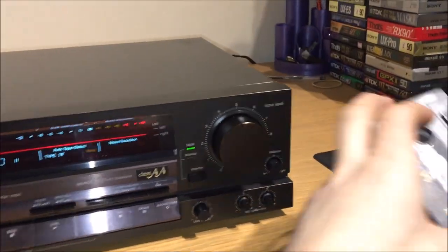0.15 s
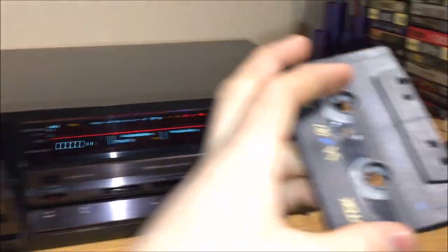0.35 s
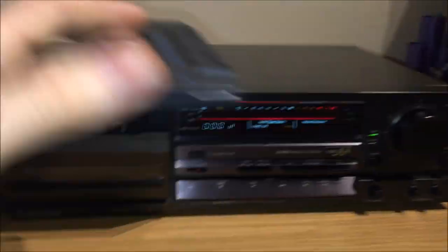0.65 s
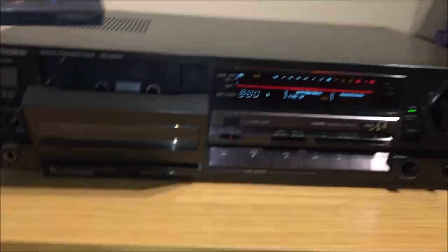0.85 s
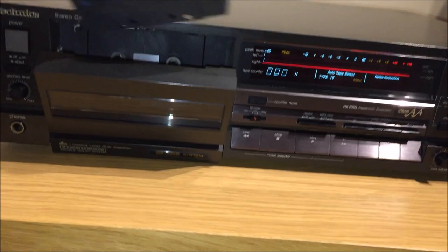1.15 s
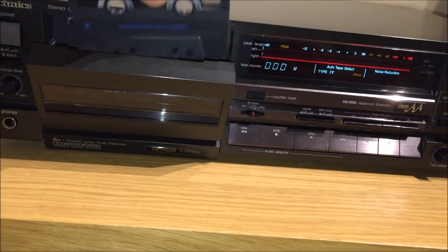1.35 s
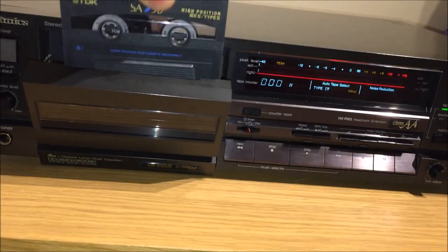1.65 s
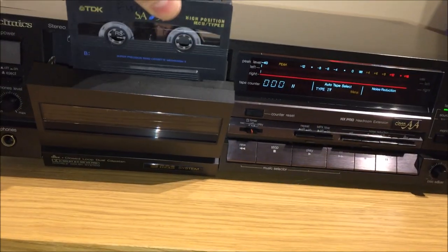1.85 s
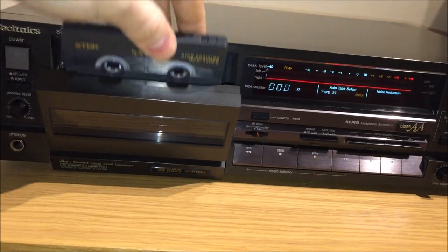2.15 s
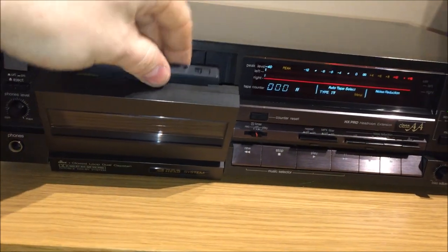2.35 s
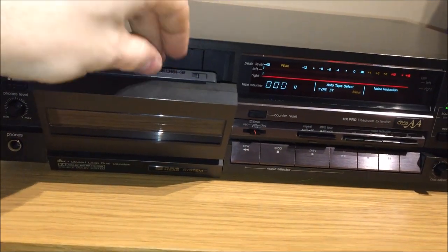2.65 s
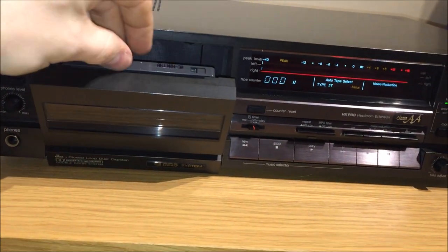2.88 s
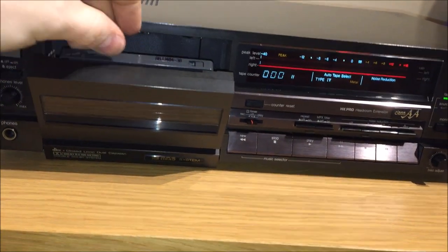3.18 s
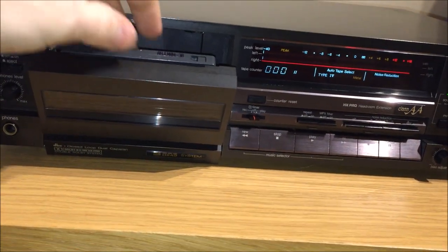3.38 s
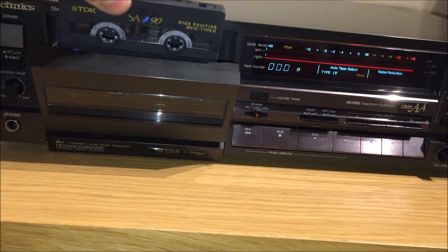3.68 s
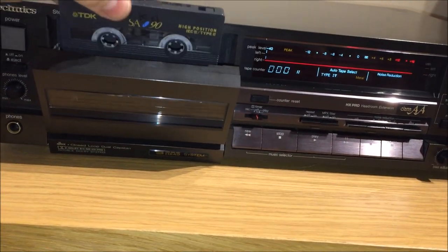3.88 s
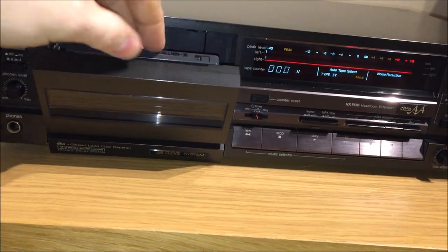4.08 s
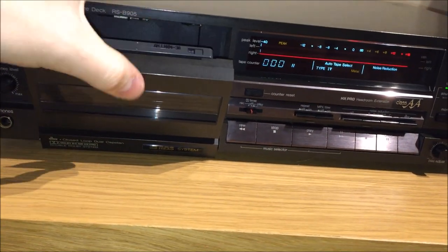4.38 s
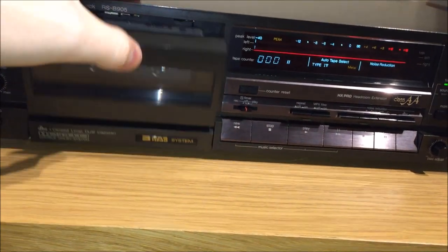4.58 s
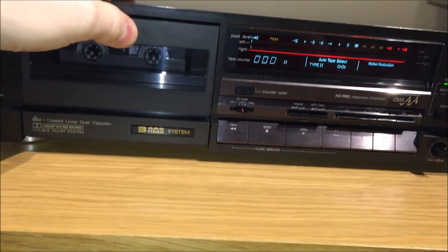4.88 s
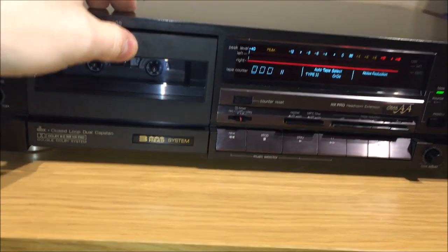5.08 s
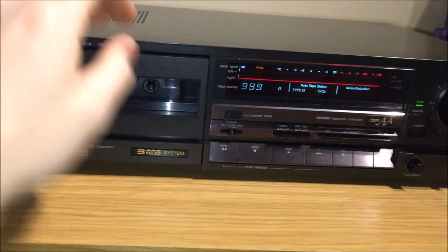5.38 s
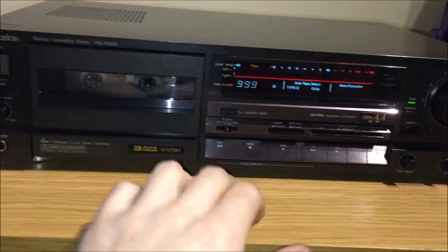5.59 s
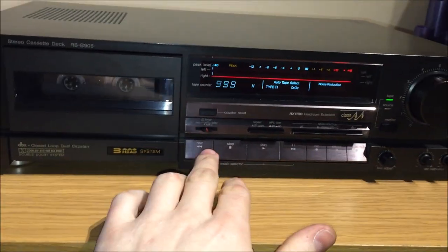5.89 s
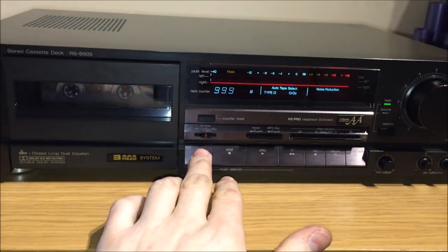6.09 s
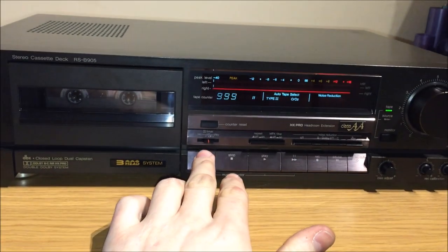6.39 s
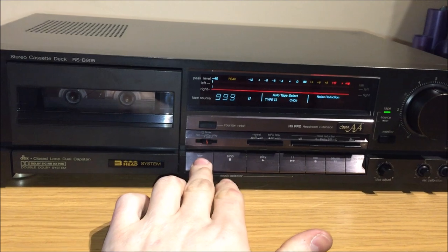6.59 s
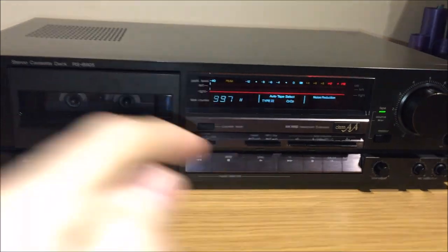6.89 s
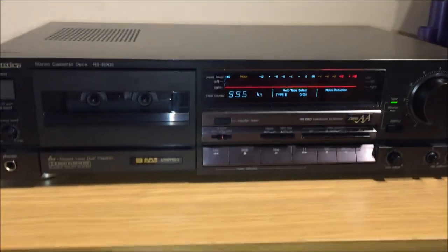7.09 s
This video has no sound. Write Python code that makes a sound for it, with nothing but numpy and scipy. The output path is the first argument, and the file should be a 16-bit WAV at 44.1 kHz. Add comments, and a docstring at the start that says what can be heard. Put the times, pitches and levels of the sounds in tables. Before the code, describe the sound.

A small, quiet room with a faint low hush, heard close up by a small microphone with thin bass. At 0 s a cassette lifts off the desk with light ticks and a brief rub; a dry plastic clack follows near 0.45. From 0.9 to 1.25 its loose hubs rattle brightly. At 1.5 it hits the deck's holder with a sharp crack and tiny spring ping, then knocks hollowly and scrapes until a firmer clack at 2.6. Sparse small taps follow around 3.1. Scraping and knocking resume at 3.55-3.75, and a loud scuff and crack seat it at 4.13-4.25. The door drags softly and snaps shut at 4.8-4.87. Metal levers clunk at 5.4, with dull soft bumps near 5.7. After a near-silent pause, a key clicks at 6.6 with a lever clack, and from 6.72 a faint, fluttering motor whir rises slightly in pitch and continues to the end.

```python
"""A cassette is picked up, rattling in its shell, and slid into the open door of a tape deck on a wooden desk.
It knocks and scrapes in the holder, drops home, and the door is pushed shut.
The transport clunks, a key is pressed and the reel motor whirs up, in a small quiet room.
Blows set off ringing modes and noise bursts, friction is a stream of tiny slips, and the motor adds whining sines."""
import sys
import numpy as np
from scipy import signal
from scipy.fft import rfft, irfft
from scipy.io import wavfile
from scipy.ndimage import uniform_filter1d

SR = 44100
rng = np.random.default_rng(int(sys.argv[2]) if len(sys.argv) > 2 else 0)


def wav_out(sig):
    """Save sig, one row per channel (or a flat mono array), as 16-bit PCM at SR to the path in sys.argv[1]."""
    wavfile.write(sys.argv[1], SR, np.round(np.clip(np.atleast_2d(sig).T, -1, 1) * 32767).astype(np.int16))


N = 319284
TIME = np.arange(N) / SR

# Levels in all tables are relative: each layer adds its own trim. Long decays may be shortened in ring().
# Ringing modes of the cassette holder: pitch_hz [Hz], level_db [dB], t60_s [s]
HOLDER_MODES = [(900, -17.5, 0.048), (1218, -16, 0.21), (1181, -2.5, 0.047), (1160, -13, 0.077),
                (1410, -19.5, 0.071), (1748, -18, 0.084), (1850, -22.5, 0.011)]
# Colour of hard plastic cracking: freq_hz [Hz], density_db [dB per Hz]
CRACK_COLOUR = [(250, -19), (550, -6.5), (850, -1), (1400, 6), (1900, 2.5), (2750, 0.5), (3400, -5),
                (4200, -1), (4850, -11.5), (5400, -6), (7000, -13.5), (11000, -29)]
# Colour of the bright tick from a sharp edge: freq_hz [Hz], density_db [dB per Hz]
EDGE_COLOUR = [(2000, -24), (5000, -3), (6800, -0.5), (9000, 0.5), (11000, -1.5), (14000, -2), (16000, -10)]
# Colour of the dull thud of the case: freq_hz [Hz], density_db [dB per Hz]
THUD_COLOUR = [(20, -42.5), (45, -16.5), (72, -7), (120, 3), (160, -10), (250, 8), (360, 0), (470, -9.5),
               (750, 0.5), (1500, -25), (5000, -53)]
# Plastic sliding in the holder: start_s [s], length_s [s], level_db [dB]
SLIDES = [(1.44, 0.073, -56), (1.86, 0.062, -41), (2.19, 0.18, -46.5), (2.345, 0.15, -38),
          (2.52, 0.085, -46.5), (3.555, 0.14, -35), (3.689, 0.07, -45.5), (4.035, 0.11, -42.5),
          (4.129, 0.07, -28.5), (4.62, .18, -52.5), (5.131, 0.04, -51)]


def from_db(db):
    """Decibels to gain."""
    return 10 ** (np.asarray(db) / 20)


def rms_one(x):
    """Scale to unit power."""
    return x / np.sqrt(np.mean(x ** 2) + 1e-20)


def at_hz(points, hz):
    """Read a table on a log-frequency axis."""
    freqs, values = np.transpose(points)
    return np.interp(np.log(np.maximum(hz, 1)), np.log(freqs), values)


def filtered(x, order, edge_hz, kind):
    """Causal Butterworth filter."""
    return signal.sosfilt(signal.butter(order, edge_hz, kind, fs=SR, output="sos"), x)


def coloured(x, spectrum):
    """Causal (minimum-phase) filter with this spectrum; white noise keeps its power."""
    size = 8192
    half = size // 2
    gain = rms_one(from_db(at_hz(spectrum, np.linspace(0, SR / 2, half + 1))))
    cepstrum = irfft(np.log(gain))
    # folding the cepstrum onto positive time gives the minimum phase
    fold = np.r_[1, np.full(half - 1, 2), 1, np.zeros(half - 1)]
    impulse_response = irfft(np.exp(rfft(cepstrum * fold)))
    return signal.oaconvolve(x, impulse_response)[:N]


def drift(per_s):
    """Smooth chance with spread 1."""
    knots = rng.standard_normal(4000)
    return rms_one(np.interp(TIME * per_s, np.arange(len(knots)), knots))


def strokes(rows):
    """Gain of separate strokes: each swells and fades, with its onset and end smoothed over about 9 ms."""
    share = np.array([0, 0.4, 1])  # start, peak and end as shares of the length
    fade_db = np.array([10.5, 0, 10.5])  # the ends are this much weaker
    gain = 0
    for start, length, db in rows:
        gain = gain + from_db(np.interp(TIME, start + length * share, db - fade_db, left=-200, right=-200))
    return uniform_filter1d(gain, size=400)


def blows(times, db):
    """One impulse for each contact."""
    out = np.zeros(N)
    places = np.round(np.asarray(times) * SR).astype(int)
    out[np.clip(places, 0, N - 1)] = from_db(db)
    return out


def ring(clicks, hz, t60):
    """A unit click sets a sine of height about 1 ringing; damping limits how long a mode can last."""
    longest_s = max(60 / hz, .12)
    radius = from_db(-60 / (min(t60, longest_s) * SR))
    angle = 2 * np.pi * hz / SR
    return signal.lfilter([0, np.sin(angle)], [1, -2 * radius * np.cos(angle), radius * radius], clicks + 1e-18)


def struck(times, db, modes):
    """Every blow shares itself differently among the modes; a band filter confines the sum to their range."""
    luck_db = rng.uniform(-2, 2, (len(times), len(modes)))
    rings = 0
    for k, (hz, level, t60) in enumerate(modes):
        rings = rings + ring(blows(times, db + level + luck_db[:, k]), hz, t60)
    pitches = np.array(modes)[:, 0]
    return filtered(rings, 2, [.8 * pitches.min(), 1.15 * pitches.max()], "band")


def clatter(times, db, spectrum, t60, rise_s):
    """Crowded modes: each blow starts a burst that builds up and dies, and favours resonances of its own."""
    size = 16384
    t, out = TIME[:size], np.zeros(N + size)
    shape = (1 - np.exp(-t / rise_s)) * from_db(-60 * t / t60)
    place = np.sqrt(np.linspace(0, 1, size // 2 + 1))  # favoured bands are wider in the treble
    for s, level in zip(times, db):
        favour_db = 3.8 * np.clip(rng.standard_normal(170), -2, 1.2)
        peaks = from_db(np.interp(place, np.linspace(0, 1, len(favour_db)), favour_db))
        burst = rms_one(irfft(rfft(rng.standard_normal(size)) * peaks))
        start = max(round(s * SR), 0)
        out[start:start + size] += from_db(level) * shape * burst
    return coloured(out[:N], spectrum)


def friction(spectrum, slips_per_s, spread_db):
    """Tiny slips of uneven size, coloured by the part that they shake."""
    slips = (rng.random(N) < slips_per_s / SR) * rng.choice([-1, 1], N)
    sizes = from_db(spread_db * np.clip(rng.standard_normal(N), -2, 2))
    return coloured(rms_one(slips * sizes), spectrum)


def room(x, wet_db, first_echo_s):
    """Direct sound plus dense reflections, each band with its own decay; the echoes fade in around first_echo_s."""
    # Room decay: freq_hz [Hz], t60_s [s]
    decay_times = [(100, 0.11), (300, 0.071), (1000, 0.27), (2500, 0.3), (6000, 0.21), (14000, 0.18)]
    t = TIME[:SR * 2 // 3]
    edges = np.geomspace(40, 18000, 13)
    tail = 0
    for low, high in zip(edges, edges[1:]):
        band = filtered(rng.standard_normal(len(t)), 2, [low, high], "band")
        tail = tail + band * from_db(-60 * t / at_hz(decay_times, np.sqrt(low * high)))
    tail = tail * np.clip(t / first_echo_s - .5, 0, 1)
    tail = tail / np.sqrt(np.sum(tail ** 2))
    return x + from_db(wet_db) * signal.oaconvolve(x, tail)[:N]


def knocking():
    """The cassette knocks and slides in the hollow door, which rings with a woody, mostly direct note."""
    # Glancing knocks; a soft fingertip mostly makes the holder ring, a hard corner also cracks, a heavy push
    # shakes the case: start_s [s], strength_db [dB], hardness_db [dB], weight_db [dB]
    knocks = [(1.6633, -30, 0, 3.5), (1.7009, -28, -5, 1), (1.7744, -29, -3.5, 1), (1.8831, -28.5, 2.5, 8),
              (1.9077, -19, 0.5, 1.5), (1.9243, -30, 0, -8.5), (2.0546, -26.5, 0.5, -7),
              (2.0733, -23.5, 4, 2), (2.1863, -30.5, -1.5, -10), (2.2415, -31.5, 0, 6),
              (2.2612, -37, 12, 1), (2.365, -25.5, 0, -13), (2.4459, -30.5, -8, 7), (2.879, -51.5, 1.5, 2),
              (3.045, -27.5, 2, -2.5), (3.1668, -34.5, 13, 8.5), (3.5456, -24, 6.5, -5.5),
              (3.6083, -24.5, 4, -3), (3.633, -29, 7.5, 0), (3.6965, -24, 1.5, -3), (3.731, -26.5, 6, -1),
              (3.7487, -36, 7, 14), (4.0718, -32.5, 4, 3.5), (4.133, -9.5, -2, -13), (4.51, -47, -20, -4),
              (4.5415, -31.5, -28, -17.5), (4.5736, -44, -1.5, 16.5), (4.6631, -31.5, -0.5, 3.5),
              (4.7453, -36, 10, 10), (4.7911, -13, 1.5, 3.5), (4.8246, -15, 1.5, -5),
              (5.1585, -35.5, -24, -5)]
    # The door drags on its damper as it swings shut: start_s [s], length_s [s], level_db [dB]
    door_swing = [(4.575, 0.3, -49)]
    # Colour of the dragging door: freq_hz [Hz], density_db [dB per Hz]
    door_colour = [(60, -7.5), (130, -8), (320, 3), (500, -13), (800, 2), (1500, -18), (2800, -12.5),
                   (5000, -26), (14000, -33)]
    s, db, hard_db, weight_db = np.transpose(knocks)
    holder = struck(s + 0.00047, db, HOLDER_MODES)
    crack = clatter(s, db + hard_db - 7, CRACK_COLOUR, t60=0.039, rise_s=0.0018)
    ticks = clatter(s, db + hard_db - 24, EDGE_COLOUR, t60=0.037, rise_s=0.00054)
    case = chassis(s, db + weight_db - 16, db + weight_db - 21, lowest_hz=100)
    door = strokes(door_swing) * friction(door_colour, slips_per_s=220, spread_db=2.5)
    plastic = room(crack + ticks + sliding() + door, wet_db=-7.5, first_echo_s=0.0041)
    return plastic + room(holder, wet_db=-13, first_echo_s=0.0043) + case


def sliding():
    """Stick and slip: uneven little jerks hiss on the plastic and keep the holder's note ringing."""
    # Colour of plastic scraping: freq_hz [Hz], density_db [dB per Hz]
    slide_colour = [(150, -15.5), (330, 5.5), (500, -28.5), (900, -6), (1180, -1.5), (1500, -8),
                    (2200, -12), (4200, -21.5), (7000, -29), (15000, -39)]
    jerks = (rng.random(N) < 500 / SR) * rng.standard_normal(N)
    note = rms_one(sum(from_db(db) * ring(jerks, hz, t60) for hz, db, t60 in HOLDER_MODES))
    hiss = friction(slide_colour, slips_per_s=900, spread_db=4)
    # the slide catches and lets go in uneven scuffs
    scuffs = from_db(4 * np.clip(drift(per_s=70), -2, 1))
    return strokes(SLIDES) * scuffs * (from_db(-4.5) * note + from_db(-4) * hiss) + grit()


def grit():
    """Edges catch at chance moments of each slide and give tiny knocks, as strong as the push behind them."""
    catches_per_s, spread_db = 70, 2
    s = np.concatenate([start + length * rng.random(round(catches_per_s * length)) for start, length, _ in SLIDES])
    push = strokes(SLIDES)[(s * SR).astype(int)]
    db = 20 * np.log10(push + 1e-9) + spread_db * rng.uniform(-1, 1, len(s))
    return clatter(s, db, CRACK_COLOUR, t60=0.018, rise_s=.0004)


def slamming():
    """Cassette and door hit their stops with a crack that shakes the case; the leaf spring and the catch twang."""
    # Slams against a stop: start_s [s], strength_db [dB], chassis_weight_db [dB], edge_sharpness_db [dB]
    slams = [(1.5138, -18, -26.5, 0.5), (1.5257, -20, -8.5, -0.5), (2.5748, -26.5, -8, -14),
             (2.5844, -20, -8.5, -4), (4.1425, -26, -21.5, -2.5), (4.1921, -10.5, -13.5, -9),
             (4.227, -33.5, -5.5, -3.5), (4.2507, -31.5, -8.5, -8), (4.8469, -21, -4, -9.5),
             (4.8657, -20.5, -10, 0.5)]
    # The cassette flicks the holder's leaf spring: start_s [s], strength_db [dB]
    spring_flick = [(1.529, -16)]
    # Modes of the leaf spring: pitch_hz [Hz], level_db [dB], t60_s [s]
    spring_modes = [(7610, -2.5, 0.052), (5000, -10.5, 0.027)]
    # The door's catch rides over its hook: start_s [s], strength_db [dB]
    catch_twangs = [(4.816, -24), (4.824, -26.5)]
    # Modes of the catch: pitch_hz [Hz], level_db [dB], t60_s [s]
    catch_modes = [(2720, 4, 0.025), (4200, -5.5, 0.031), (1900, -5.5, 0.0428)]
    s, db, weight_db, sharp_db = np.transpose(slams)
    holder = struck(s + 0.00046, db - 1.5, HOLDER_MODES)
    crack = clatter(s, db + 3.5, CRACK_COLOUR, t60=0.035, rise_s=0.0016)
    ticks = clatter(s, db + sharp_db - 3.0, EDGE_COLOUR, t60=0.041, rise_s=0.00036)
    leaf_spring = struck(*np.transpose(spring_flick), spring_modes)
    catch = struck(*np.transpose(catch_twangs), catch_modes)
    case = chassis(s, db + weight_db - 0.5, db + weight_db - 1.5, lowest_hz=66)
    hard = room(crack + ticks, wet_db=-7.5, first_echo_s=0.0038)
    ringing = room(holder + leaf_spring + catch, wet_db=-11.5, first_echo_s=0.0068)
    return hard + ringing + case


def chassis(s, boom_db, thud_db, lowest_hz):
    """The heavy case and the desk under it answer late and ring low; a high-pass thins the deepest modes."""
    # Modes of case and desk: pitch_hz [Hz], level_db [dB], t60_s [s]
    chassis_modes = [(72.5, -13, 0.41), (126, -9, 0.3), (224, -12, .16), (251, -9, 0.062),
                     (307, -9.5, 0.19), (345.6, -3.5, 0.45), (723, -14, 0.11), (775, -18, .35),
                     (910, -11.5, 0.088)]
    boom = struck(s + 0.0087, boom_db, chassis_modes)
    thud = clatter(s + .003, thud_db, THUD_COLOUR, t60=0.29, rise_s=0.003)
    return filtered(boom + thud, 2, lowest_hz, "high")


def cassette_in_hand():
    """Hubs rattle and rebound in the thin shell while fingers shift on it."""
    # Loose hubs rattle: start_s [s], strength_db [dB], edge_sharpness_db [dB]
    rattles = [(0.429, -44.5, 5), (0.8886, -27.5, 8.5), (0.9138, -27, -13), (0.9428, -27, -5),
               (0.9963, -33.5, -2.5), (1.0164, -20, -3.5), (1.0761, -25.5, 5), (1.1201, -36, 8.5),
               (1.1642, -23.5, -1), (1.1712, -20, 3), (1.1882, -29.5, 2), (1.2045, -26, 2),
               (1.2216, -28, 3), (1.2463, -27, -9)]
    # Colour of the thin shell: freq_hz [Hz], density_db [dB per Hz]
    shell_colour = [(300, -26.5), (800, -9.5), (1550, 9.5), (2000, 1.5), (2600, 5.5), (3600, -9),
                    (6500, -10), (10000, -36.5)]
    # Colour of the shell's edges: freq_hz [Hz], density_db [dB per Hz]
    shell_edge_colour = [(1500, -20.5), (4000, -2.5), (6700, 4), (8500, -2.5), (12000, -6), (16000, -13)]
    # The cassette lifts off the desk: start_s [s], strength_db [dB]
    lift_contacts = [(0.005, -35.5), (0.040, -35.5), (0.118, -45)]
    # Modes heard at the lift: pitch_hz [Hz], level_db [dB], t60_s [s]
    lift_modes = [(1007, -2, .045), (1575, -2, .045), (2850, -7, .04)]
    # A hub clacks against its stop: start_s [s], strength_db [dB]
    hub_clacks = [(0.467, -21.5), (1.84, -33.5)]
    # Colour of the hub: freq_hz [Hz], density_db [dB per Hz]
    hub_colour = [(1000, -30.5), (1350, 0.5), (1700, 5.5), (2050, 4), (2300, 7), (2650, 6.5), (3000, -1.5),
                  (3950, -16), (4550, -1.5), (5200, -28), (9000, -40.5)]
    # Fingers rub on the shell: start_s [s], length_s [s], level_db [dB]
    rubs = [(0.0, 0.045, -36), (0.4, 0.37, -57.5), (0.85, .48, -45.5), (1.075, 0.032, -40)]
    # Colour of the rubbing: freq_hz [Hz], density_db [dB per Hz]
    rub_colour = [(300, -16), (1000, -6), (1600, 7.5), (2700, 0.5), (4000, -13.5), (7000, -14.5),
                  (15000, -19)]
    # The shell brushes against fingers and door: start_s [s], length_s [s], level_db [dB]
    brushes = [(0.675, 0.025, -62.5), (3.083, .012, -42.5), (3.58, 0.11, -51), (3.7, 0.064, -52)]

    first = np.array(rattles)
    rebound = first + [.0115, -11, 0]  # each hub rebounds once: later (s), weaker (dB), as sharp
    s, db, sharp_db = np.vstack([first, rebound]).T
    shell = clatter(s, db - 2.5, shell_colour, t60=0.036, rise_s=0.0004)
    ticks = clatter(s, db + sharp_db - 6, shell_edge_colour, t60=0.028, rise_s=.0001)
    snap = coloured(blows(s, db + 2), shell_edge_colour)
    lift_s, lift_db = np.transpose(lift_contacts)
    lift = struck(lift_s, lift_db, lift_modes)
    lift = lift + clatter(lift_s, lift_db + 1.5, shell_colour, t60=0.054, rise_s=.0003)
    hub = clatter(*np.transpose(hub_clacks), hub_colour, t60=0.025, rise_s=0.00018)
    rub = from_db(-3.0) * strokes(rubs) * friction(rub_colour, slips_per_s=2500, spread_db=3.5)
    brush = strokes(brushes) * friction(shell_edge_colour, slips_per_s=4500, spread_db=12)
    return room(shell + ticks + snap + lift + hub + rub + brush, wet_db=-7.5, first_echo_s=0.0029)


def transport():
    """Metal levers snap over and shake the case, the key clicks; soft bumps of the mechanism reach the desk."""
    # Levers snap over; the faint row at 5.68 s is the knocky body of a soft bump:
    # start_s [s], strength_db [dB], metal_ring_db [dB], edge_sharpness_db [dB]
    metal_knocks = [(5.399, -24.5, 9.5, 4), (5.427, -32.5, 5, -8), (5.456, -33.5, -11, -3.5),
                    (5.68, -64, 16, -4), (6.627, -26.5, 3, 2), (7.037, -61, 9, 8)]
    # Modes of the levers: pitch_hz [Hz], level_db [dB], t60_s [s]
    lever_modes = [(766, 4.5, 0.04), (1230, -15.5, 0.022), (1310, -19, 0.05), (1430, 4.5, 0.038),
                   (2152, -3, .035), (2636, 0, 0.043)]
    # Colour of the levers' thud: freq_hz [Hz], density_db [dB per Hz]
    lever_thud_colour = [(20, -36), (45, -16), (80, -2.5), (125, 5.5), (200, -7), (300, 0), (380, -1),
                         (480, -11), (750, -7), (1500, -25), (5000, -44.5)]
    # The key goes down in two clicks, the first against the case:
    # start_s [s], strength_db [dB], chassis_weight_db [dB]
    key_clicks = [(6.5762, -42.5, -1.5), (6.598, -36, -16)]
    # Soft bumps of the mechanism: start_s [s], strength_db [dB]
    soft_bumps = [(5.662, -29), (5.681, -28.5), (5.747, -40), (6.783, -42)]
    # Colour of the bumps: freq_hz [Hz], density_db [dB per Hz]
    bump_colour = [(35, -19), (65, -12.5), (130, 0.5), (250, -9), (450, -17.5), (750, -20.5), (1500, -28),
                   (3000, -33), (7000, -32), (14000, -34.5)]
    # Modes of the desk: pitch_hz [Hz], level_db [dB], t60_s [s]
    desk_modes = [(71, -0.24, 0.52), (134.3, -1.33, 0.16)]

    s, db, ring_db, sharp_db = np.transpose(metal_knocks)
    metal = struck(s + 0.00204, db + ring_db - 9.5, lever_modes)
    clack = clatter(s, db + 3.5, CRACK_COLOUR, t60=0.093, rise_s=0.0023)
    ticks = clatter(s, db + sharp_db + 0.5, EDGE_COLOUR, t60=0.041, rise_s=0.00038)
    thud = clatter(s + 0.0049, db - 4.0, lever_thud_colour, t60=0.28, rise_s=0.011)
    key_s, key_db, weight_db = np.transpose(key_clicks)
    key = clatter(key_s, key_db, CRACK_COLOUR, t60=0.064, rise_s=0.00054)
    key = key + clatter(key_s, key_db - 7.5, EDGE_COLOUR, t60=0.023, rise_s=.0003)
    key_thud = clatter(key_s + .003, key_db + weight_db, THUD_COLOUR, t60=0.16, rise_s=.003)
    bump_s, bump_db = np.transpose(soft_bumps)
    bumps = clatter(bump_s, bump_db - 12.0, bump_colour, t60=0.24, rise_s=0.014)
    desk = struck(bump_s, bump_db - 13.5, desk_modes)
    bright = room(metal + clack + ticks + key, wet_db=-9.0, first_echo_s=0.0092)
    return bright + key_thud + thud + bumps + desk


def reel_motor():
    """A wavering gear whine rises with the speed; teeth rattle, and the whir flutters once a turn."""
    # Partials of the drive: multiple [of the gear whine's pitch], level_db [dB]
    whine_partials = [(0.333, -12), (.68, -4), (1.002, 0.5), (1.78, -17), (1.9, -13)]
    # Colour of the whir: freq_hz [Hz], density_db [dB per Hz]
    whir_colour = [(35, -52), (60, -2), (133, -17), (164, -43), (193, -18), (338, 2), (682, -52),
                   (767, -3.5), (1280, -3), (1440, -8), (1660, -17), (2650, -11), (7230, -32), (10500, -34),
                   (16000, -24)]
    # Gear teeth rattle in the drive: pitch_hz [Hz], level_db [dB], t60_s [s]
    gear_modes = [(797, -1, 0.046), (1106, -5, 0.019), (1430, 4, 0.033), (2760, -16, 0.013),
                  (4100, -1, 0.016)]
    # speed as the pitch of the gear whine: it spins up, overshoots a little and settles
    motor_start_s, settle_s, hunt_period_s = 6.72, .137, .84
    start_hz, run_hz, gear_teeth = 1275, 1470, 20
    t = np.maximum(TIME - motor_start_s, 0)
    hz = run_hz - (run_hz - start_hz) * np.exp(-t / settle_s) * np.cos(2 * np.pi * t / hunt_period_s)
    wavering_hz = hz * (1 + .01 * drift(per_s=110))
    phase = 2 * np.pi * np.cumsum(wavering_hz) / SR
    whine = 0
    for multiple, db in whine_partials:
        whine = whine + from_db(db + 3.8 * drift(per_s=56)) * np.sin(multiple * phase)
    flutter = from_db(1.5 * drift(per_s=160) + 2 * np.sin(phase / gear_teeth))
    knocks = (rng.random(N) < 220 / SR) * rng.standard_normal(N)
    rattle = rms_one(sum(from_db(db) * ring(knocks, mode_hz, t60) for mode_hz, db, t60 in gear_modes))
    whir = from_db(-59) * friction(whir_colour, slips_per_s=4100, spread_db=1.0) + from_db(-65.5) * rattle
    whine_rise, whir_rise = np.clip(t / 0.066, 0, 1), np.clip(t / 0.028, 0, 1)
    return from_db(-58.5) * whine_rise * whine + whir_rise * flutter * whir


def room_air():
    """The hush of the still room: steady coloured noise."""
    # Colour of the hush: freq_hz [Hz], density_db [dB per Hz]
    air_colour = [(15, -51), (25, -6), (145, -7.5), (185, -6.5), (249, -10), (427, -17.5), (476, -17),
                  (714, -19), (863, -18.5), (6740, -28.5), (16000, -35.5)]
    return from_db(-67.5) * coloured(rng.standard_normal(N), air_colour)


def scene():
    """All the sources over the hush of the room."""
    return (knocking() + slamming() + cassette_in_hand() + transport() + reel_motor() + room_air())[None]


def record(dry):
    """The small microphone loses the deep bass; the top is cut steeply above 16 kHz."""
    thin = filtered(dry, 2, 48, "high")
    return signal.sosfilt(signal.ellip(10, .2, 75, 16000, fs=SR, output="sos"), thin)


dry = scene()
out = record(dry)
wav_out(out)
```